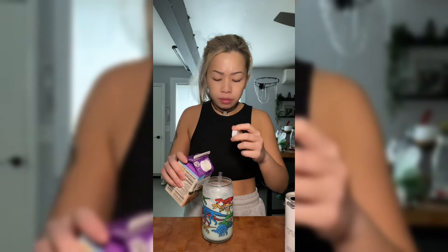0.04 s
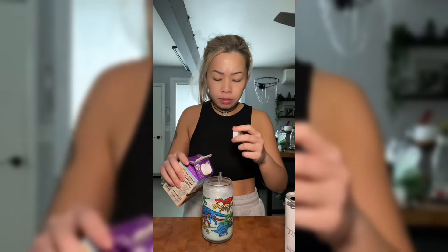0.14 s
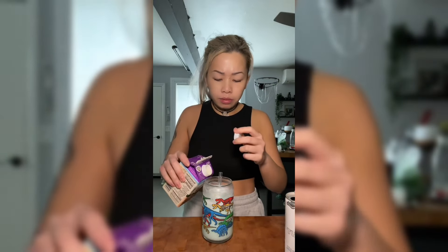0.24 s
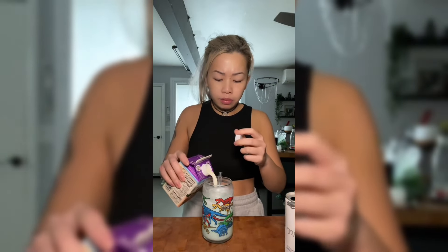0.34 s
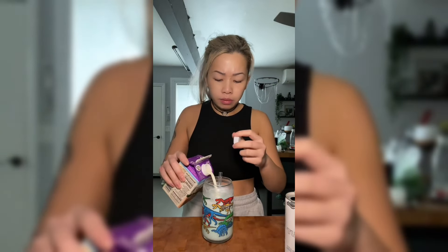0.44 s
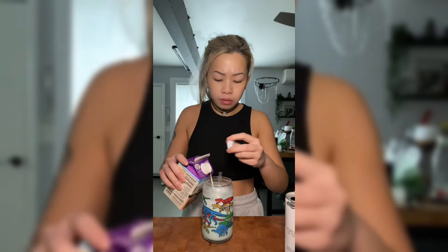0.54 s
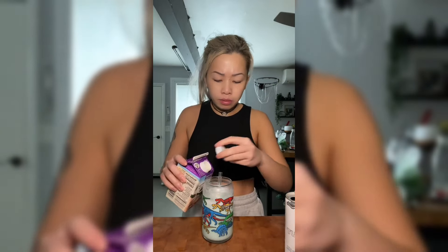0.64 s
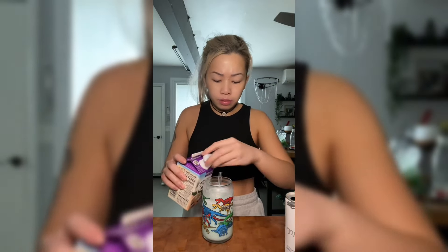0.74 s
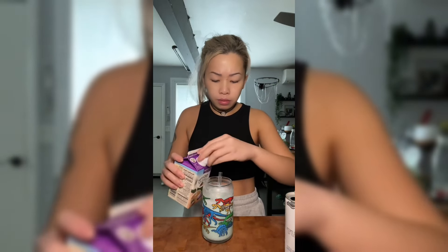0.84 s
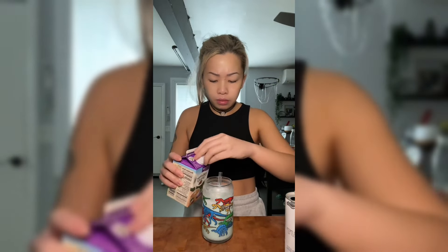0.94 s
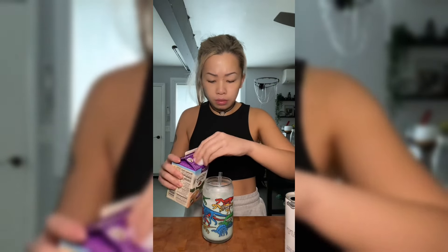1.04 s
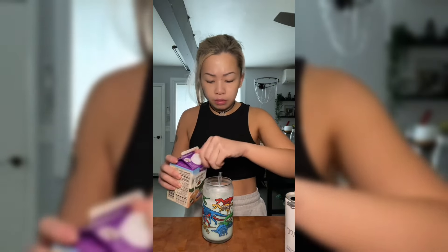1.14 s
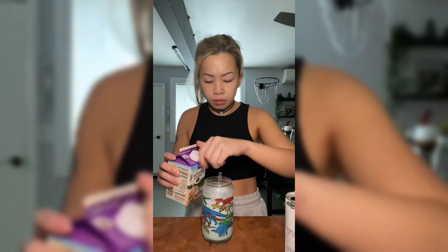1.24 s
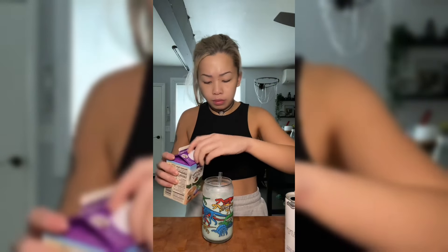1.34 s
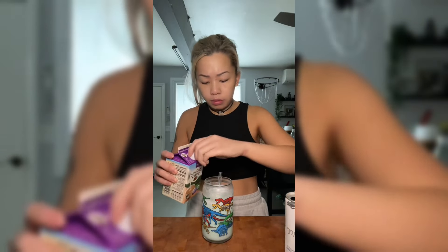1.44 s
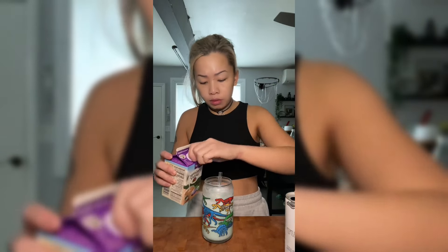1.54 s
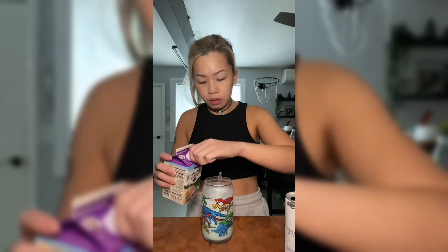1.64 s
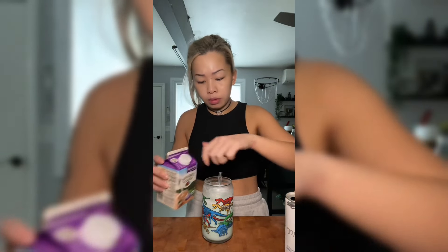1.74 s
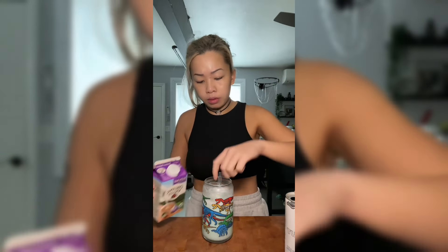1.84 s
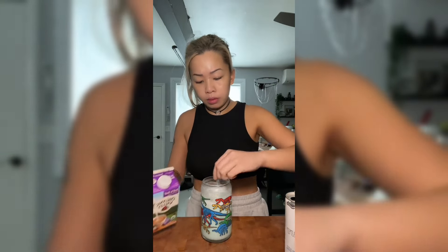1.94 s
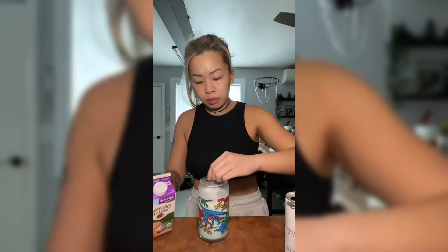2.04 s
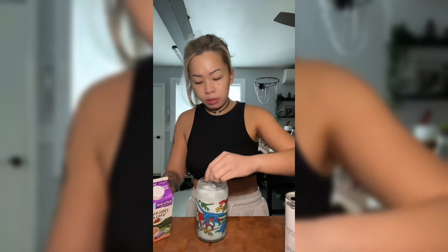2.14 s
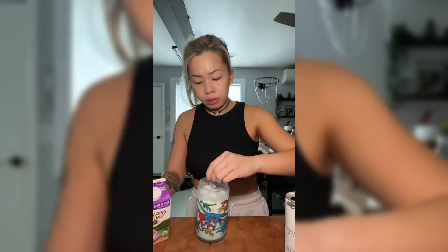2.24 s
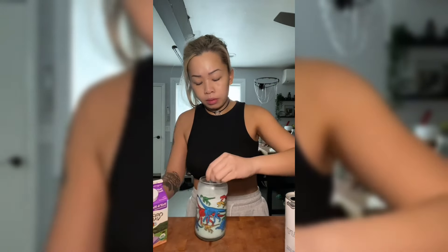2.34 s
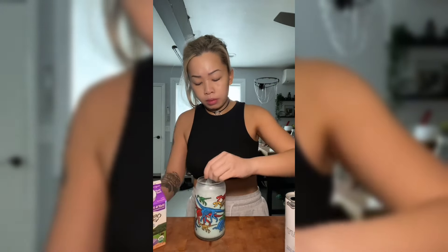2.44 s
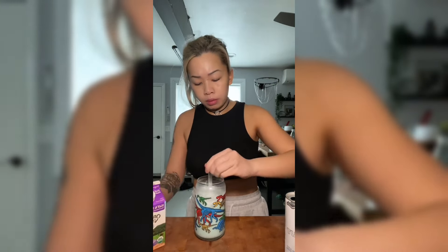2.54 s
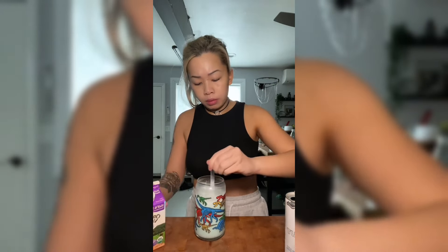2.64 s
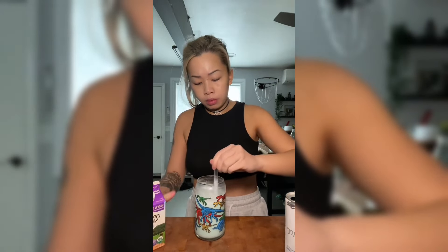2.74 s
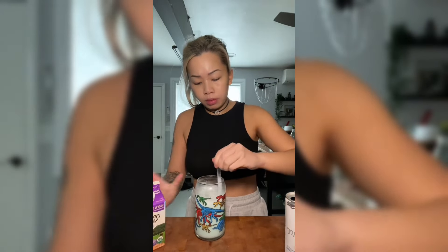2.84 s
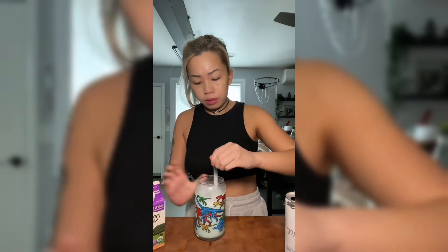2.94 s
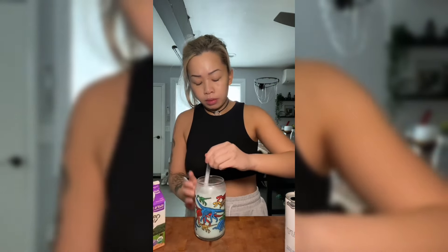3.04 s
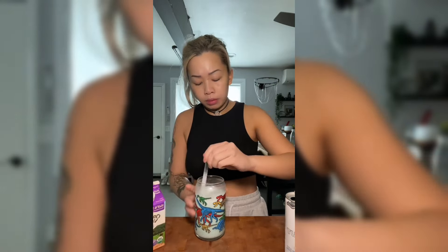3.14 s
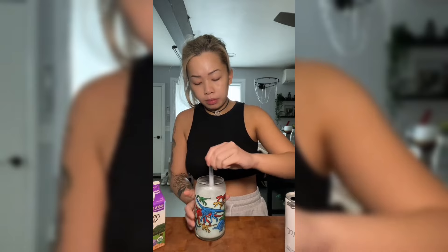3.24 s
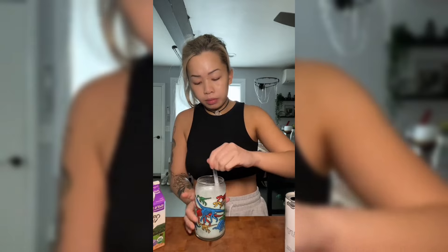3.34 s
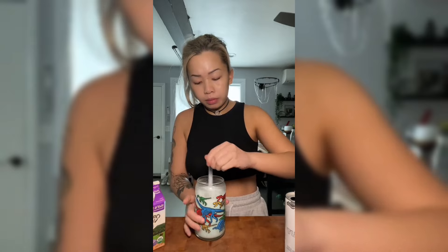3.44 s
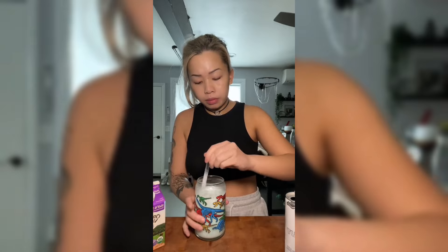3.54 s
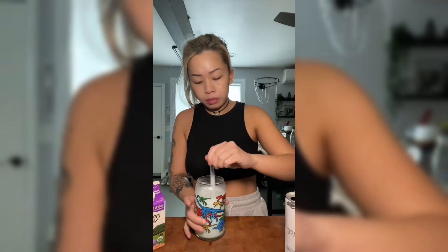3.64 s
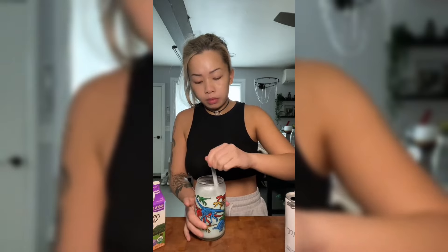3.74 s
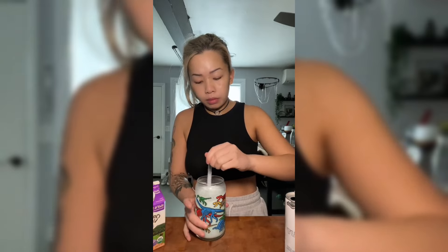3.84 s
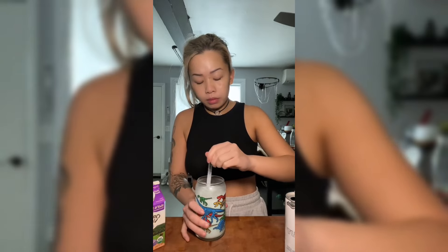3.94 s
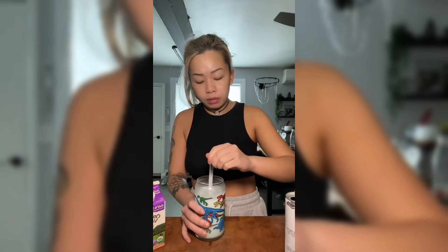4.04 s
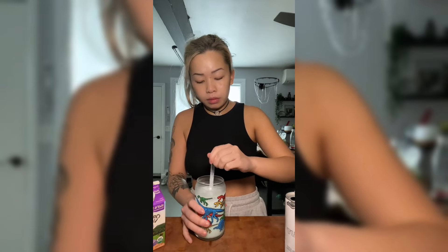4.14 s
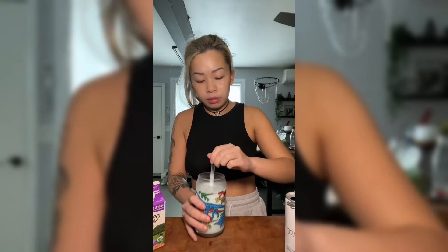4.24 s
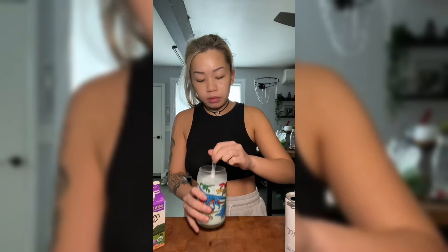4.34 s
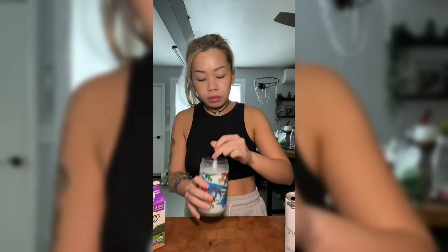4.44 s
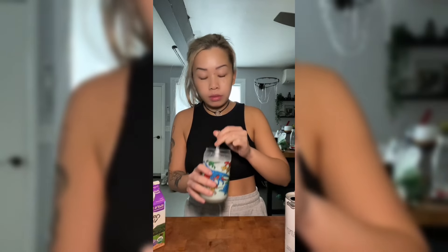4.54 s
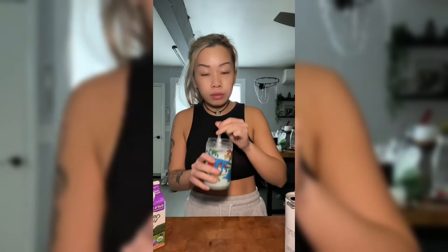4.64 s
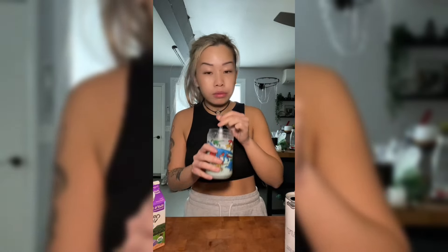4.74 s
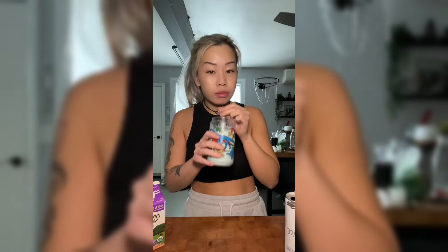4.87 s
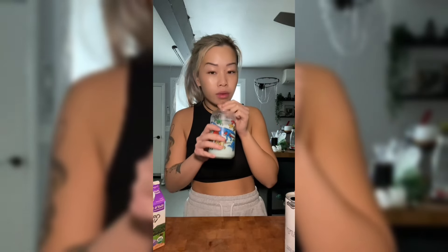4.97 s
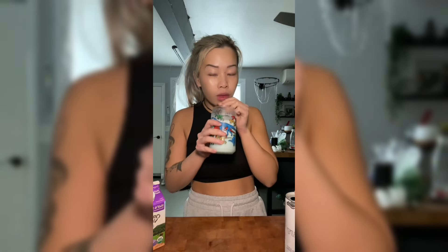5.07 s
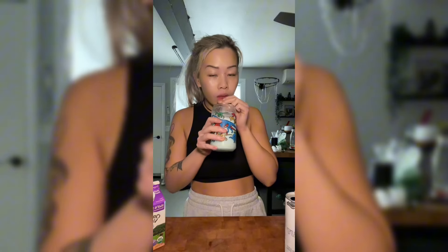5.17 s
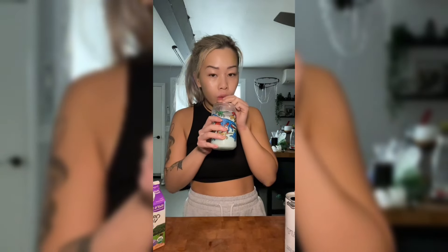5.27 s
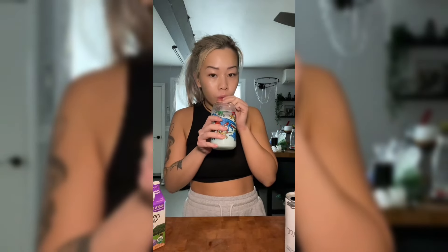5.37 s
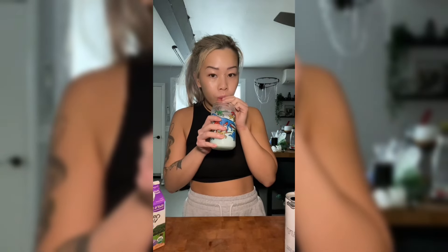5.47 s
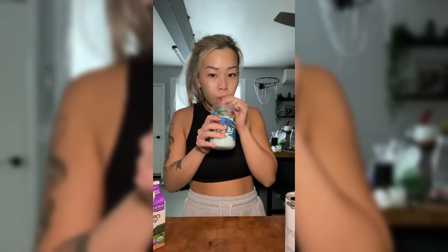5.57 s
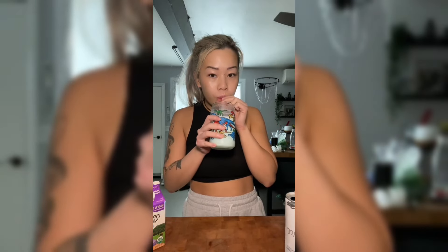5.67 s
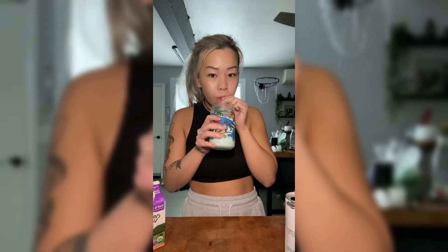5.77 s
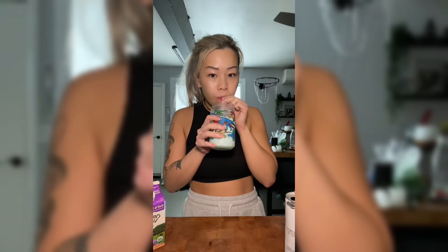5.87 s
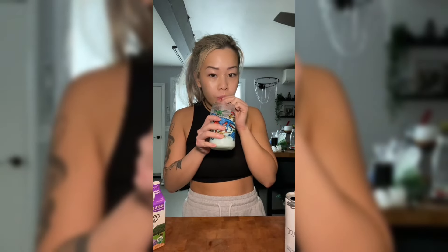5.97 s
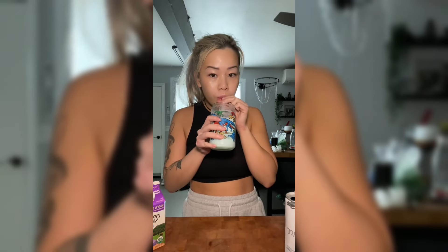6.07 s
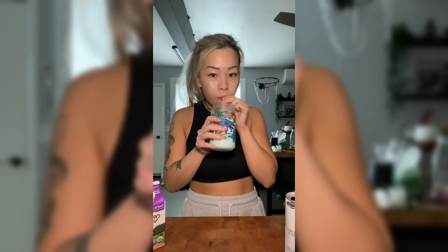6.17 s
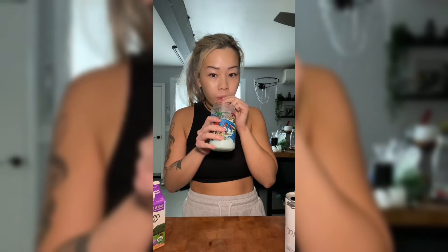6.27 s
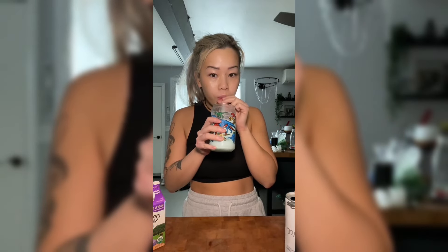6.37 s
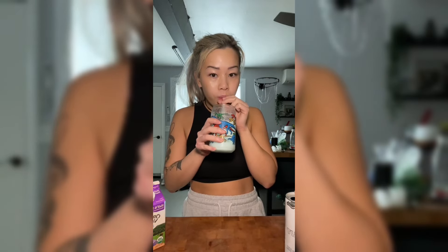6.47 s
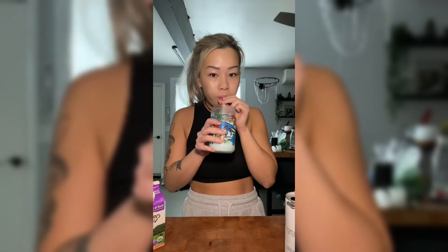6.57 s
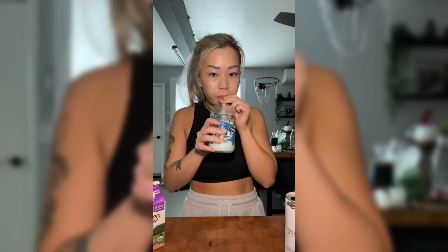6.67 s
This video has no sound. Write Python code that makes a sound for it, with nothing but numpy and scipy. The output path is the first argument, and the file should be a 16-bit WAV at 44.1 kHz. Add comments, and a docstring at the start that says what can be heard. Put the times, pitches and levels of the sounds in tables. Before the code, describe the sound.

Faint plastic clicks, then wet ice rattling busily against a filled glass jar, fading as it is lifted in a quiet humming kitchen.

```python
"""Quiet kitchen: ice cubes in a glass jar of milky drink, stirred with a straw a step from a phone.
First a carton's cap is screwed shut: clicks ring panel modes, noise strokes and rubs slide.
Then cubes knock on the liquid-damped wall and each other (pitched knock, clink); some contacts snap brightly.
A hand closes round the jar and dulls its ring; the cubes settle as it is lifted.
Hum, appliance drone, air and hiss lie beneath; the phone's limiter ducks after the hardest clink."""
import sys
import numpy as np
from scipy import signal
from scipy.fft import rfft, irfft
from scipy.io import wavfile
from scipy.ndimage import uniform_filter1d, minimum_filter1d

SR = 44100
rng = np.random.default_rng(int(sys.argv[2]) if len(sys.argv) > 2 else 0)


def unload_wav(signal):
    """Save mono or channel-first audio to the path in sys.argv[1] as 16-bit WAV at rate SR, clipped to [-1, 1]."""
    wavfile.write(
        sys.argv[1],
        SR,
        np.round(np.clip(np.atleast_2d(signal).T, -1, 1) * 32767).astype(np.int16),
    )


N = 295858
T = np.arange(N) / SR
HIT_T = T[:SR // 8]
LEAD_S = .002  # time from the start of a hit to its peak

# clearest ice contacts: (time [s], knock pitch [Hz], knock level [dB], hardness: clink over knock [dB])
ICE_CONTACTS = [(1.9514, 1080, -38.5, -23), (2.0021, 1160, -46.5, -7), (2.201, 1200, -39, -7),
                (2.252, 1200, -39.5, -11), (2.277, 1200, -40.5, -3), (2.2827, 1120, -43, -8),
                (2.3043, 1110, -32, -13), (2.313, 1160, -39, -22), (2.3408, 1250, -32.5, -0.5),
                (2.3799, 1210, -33, -7), (2.4023, 1080, -27.5, 0.5), (2.483, 1200, -33.5, -12),
                (2.5157, 1160, -37, 12.5), (2.573, 1170, -37, -4.5), (2.5991, 1440, -33, -6.5),
                (2.624, 1720, -39.5, -11), (2.6617, 1550, -41, -25), (2.6867, 1160, -35, -30),
                (2.7, 1130, -34, -16), (2.7051, 1150, -27, 1), (2.724, 1230, -45, -19),
                (2.744, 1220, -36.5, -17), (2.807, 1500, -41, 7), (2.8136, 1370, -29.5, -1.5),
                (2.8277, 1580, -29, -17), (2.994, 1650, -36, -7), (3.0107, 1500, -42, -23),
                (3.0214, 1210, -36, -25), (3.0488, 1430, -28.5, -12), (3.072, 1210, -51, -15),
                (3.089, 1380, -38.5, -2), (3.1163, 2080, -42.5, 3), (3.172, 1580, -41, 3.5),
                (3.1898, 1550, -33.5, -6), (3.221, 1590, -38.5, -15), (3.246, 1600, -45.5, 3.5),
                (3.3024, 1230, -39, -10), (3.3653, 1450, -29.5, -25), (3.533, 2260, -41.5, -7),
                (3.5564, 1030, -43, 0), (3.6, 1360, -41.5, -3), (3.612, 1200, -44, -8),
                (3.682, 1330, -45, -24), (3.727, 1160, -43.5, -7), (3.8, 900, -45, -22),
                (3.8331, 1155, -31, -3.5), (3.876, 1440, -32.5, -12.5), (3.9316, 1100, -38, -18),
                (3.9462, 1500, -33.5, -6), (3.954, 1480, -41, -12), (4.0115, 1450, -38.5, -7),
                (4.064, 1470, -52, -19), (4.0704, 1580, -36, -22), (4.086, 1910, -36.5, -8.5),
                (4.1821, 1770, -37, -7.5), (4.2246, 1120, -39, -34), (4.265, 1580, -40, -21),
                (4.3147, 1290, -40, -11), (4.3234, 1880, -38, -3), (4.3667, 1025, -36.5, -7.5),
                (4.376, 1750, -39, -8), (4.4514, 980, -40.5, -12), (4.52, 1060, -40.5, -8),
                (4.6183, 1337, -45, -1), (4.691, 1260, -49.5, -8), (4.8183, 1490, -43, -4),
                (4.9487, 1146, -42.5, 0.5), (5.023, 1060, -51, -3), (5.0754, 950, -41.5, -24),
                (5.094, 1600, -44, 5), (5.1494, 1280, -36, -6), (5.305, 1430, -49.5, -7),
                (5.476, 1170, -54.5, -10), (5.593, 1120, -56, -1), (5.731, 1124, -40.5, -25),
                (5.7487, 1220, -43.5, -21), (5.7724, 1080, -44, -21), (6.0767, 1180, -47.5, -29)]
# how hard the cubes jostle: (time [s], level before each layer's gain [dB])
STIRRING = [(1.85, -72), (1.94, -64), (1.97, -58), (2.02, -61), (2.1, -67.5), (2.2, -70), (2.3, -52.5),
            (2.44, -55), (2.54, -47.5), (3.03, -46.5), (3.21, -44.5), (3.36, -50.5), (3.64, -51.5),
            (3.79, -52.5), (3.92, -44.5), (4.1, -53.5), (4.87, -55), (5.09, -59.5), (5.24, -64.5),
            (5.419, -72), (5.95, -63), (6.14, -79), (6.601, -73.5)]
# spectrum of a dull thud: (frequency [Hz], level [dB])
THUD_SPECTRUM = [(120, -50), (300, -26), (700, -3), (1000, 8.5), (2200, -3.5), (3000, -6), (5000, -53)]
# spectrum of a clink: (frequency [Hz], level [dB])
CLINK_SPECTRUM = [(1500, -17), (2300, 1.5), (2750, -9.5), (3150, 1.5), (3650, -5.5), (4500, -2), (5100, -2),
                  (5900, -7.5), (7200, -14), (8300, -11.5), (9700, -8.5), (11500, -18)]


def undb(db):
    """Decibels to gain."""
    return 10 ** (np.asarray(db) / 20)


def level(x, db):
    """Set the rms level."""
    return x * undb(db) / np.sqrt(np.mean(x ** 2))


def strike(x, db, size=353):
    """Set the rms level of the first 8 ms of a hit."""
    return x * undb(db) / np.sqrt(np.mean(x[:size] ** 2))


def colour(x, points):
    """Causal (minimum-phase) filter with a smooth (Hz, dB) spectrum."""
    hz, db = np.transpose(points)
    size = 4096
    bins_hz = np.maximum(np.fft.rfftfreq(size, 1 / SR), 1)
    gain = undb(np.interp(np.log(bins_hz), np.log(hz), db))
    cepstrum = irfft(np.log(gain))
    # fold the cepstrum to make the response causal
    cepstrum[1:size // 2] *= 2
    cepstrum[size // 2 + 1:] = 0
    response = irfft(np.exp(rfft(cepstrum)))
    return signal.fftconvolve(x, response)[:len(x)]


def varied(points, scatter_db=2.5, shift=0.018):
    """Every piece has its own size, and so its own version of a spectrum."""
    hz, db = np.transpose(points)
    piece_hz = hz * np.exp(shift * rng.standard_normal())
    return np.column_stack([piece_hz, db + scatter_db * rng.standard_normal(len(db))])


def add(track, s, x):
    """Mix a sound in at time s."""
    start = int(s * SR)
    track[start:start + len(x)] += x[:N - start]


def flutter(rate_hz, depth_db):
    """An uneven gain: random levels held 1 / rate_hz s and smoothed."""
    hold = int(SR / rate_hz)
    steps = rng.standard_normal(N)[np.arange(N) // hold]
    return undb(depth_db * uniform_filter1d(steps, hold))


def ring(hz, t60_s):
    """One decaying mode."""
    return np.sin(2 * np.pi * hz * HIT_T) * np.exp(-np.log(1000) * HIT_T / t60_s)


def body(modes, scatter_db=3, detune=0.016):
    """Modes whose strength, sign and pitch change with the place of contact and the sloshing liquid."""
    out = np.zeros(len(HIT_T))
    for hz, db, t60_s in modes:
        sign, strength, pitch = rng.standard_normal(3)
        gain = np.sign(sign) * undb(db + scatter_db * strength)
        out += gain * ring(hz * (1 + detune * pitch), t60_s)
    return out


def sounded(force, response):
    """A body's answer to a contact force, at unit level."""
    return strike(signal.fftconvolve(force, response)[:len(force)], 0)


def contact(decay_s, rise_s=0.0021, peak=0.33, peak_s=0.0013):
    """A short noise burst that rises, peaks and dies away."""
    since = HIT_T - LEAD_S
    swell = np.exp(-np.abs(since) / np.where(since < 0, rise_s, decay_s))
    shape = swell + peak * np.exp(-np.abs(since) / peak_s)
    return shape * rng.standard_normal(len(HIT_T))


def knock(hz, cycles):
    """A short hollow knock: it swells for a cycle or two and dies away within the given number of cycles."""
    return strike(HIT_T * ring(hz, cycles / hz), 0)


def background():
    """Mains hum, the wavering drone of an appliance (narrow noise bands), room air and microphone hiss."""
    # appliance drone bands: (frequency [Hz], width [Hz], level [dB])
    drone_bands = [(56.6, 2.2, -61.5), (94.2, 4.5, -66.5), (120.2, 3.9, -60), (297.3, 28, -68.5)]
    # spectra of room air and hiss: (frequency [Hz], level [dB])
    air_spectrum = [(25, -46), (45, 9.5), (70, 4.5), (150, 7.5), (200, 0.5), (320, -0.5), (600, -8),
                    (900, -19), (1800, -19), (3500, -23.5), (16000, -30.5)]
    hiss_spectrum = [(1500, -27), (2500, -9), (2950, -3.5), (3500, -7.5), (4200, 1.5), (4700, 0.5),
                     (5800, 7.5), (7800, 9), (9000, 4), (10000, 4.5), (12400, -1.5), (14000, 4),
                     (16000, 1.5)]
    hum_hz, hum_db, air_db, hiss_db = 120.24, -49.5, -55, -50
    bins_hz = np.fft.rfftfreq(N, 1 / SR)
    out = level(np.sin(2 * np.pi * hum_hz * T), hum_db)
    for hz, width_hz, db in drone_bands:
        resonance = 1 / (1 + (2 * (bins_hz - hz) / width_hz) ** 2)
        out += level(irfft(rfft(rng.standard_normal(N)) * resonance, N), db)
    out += level(colour(rng.standard_normal(N), air_spectrum), air_db)
    out += level(colour(rng.standard_normal(N), hiss_spectrum), hiss_db)
    return out


def kitchen(x, t60_s=0.25, wet_db=-13.0, early_db=-13, early_t60_s=0.017, gap_s=0.0022):
    """Quick reflections from table and body, then the room's short tail."""
    # spectrum of the reflections: (frequency [Hz], level [dB])
    room_spectrum = [(150, 2.5), (1200, 0), (2500, 8.5), (5000, 1.5), (9500, 9.5), (12000, -2), (16000, 5)]
    t = T[:SR * 3 // 4]
    response = np.zeros(len(t))
    for decay_s, db in ((early_t60_s, early_db), (t60_s, wet_db)):
        echoes = rng.standard_normal(len(t)) * np.exp(-np.log(1000) * t / decay_s) * (t > gap_s)
        response += undb(db) * echoes / np.linalg.norm(echoes)
    return x + signal.fftconvolve(x, colour(response, room_spectrum))[:N]


def hits(table, modes, highs, bright, lowest_hz, burst_s, tone_db, cycles, thud_db, clink_s,
         crack_db, crack_s, ping_db, focus_db=9, blow=14):
    """Each contact: a short pitched knock rings the wall, with a clink of coloured noise, ping and crack."""
    # spectrum of a crack: (frequency [Hz], level [dB])
    crack_spectrum = [(3000, -66), (7000, 20), (10000, -18), (12300, -4), (14000, 10), (16000, -30)]
    # from grip_s on, a hand damps the wall's ring and its bright ping
    grip_s, grip_wall_db, grip_ping_db = 3.26, -4, -12
    crack_per_hardness = 0.14  # dB of crack per dB of hardness
    out = np.zeros(N)
    radiate = signal.butter(3, lowest_hz, "high", fs=SR, output="sos")
    # one clean blow at the peak of a short noise burst
    tap = signal.unit_impulse(len(HIT_T), int(LEAD_S * SR))
    for s, hz, knock_db, hardness_db in table:
        gripped = s > grip_s
        force = strike(contact(burst_s), 0) + blow * tap
        hard = strike(contact(clink_s), 0) + blow * tap
        # the place of contact favours the modes near the pitch of the knock
        near = [(f, db - focus_db * abs(np.log2(f / hz)), t60_s) for f, db, t60_s in modes]
        wall = undb(gripped * grip_wall_db) * sounded(force, body(near))
        tone = undb(tone_db) * sounded(tap, knock(hz, cycles))
        thud = strike(colour(force, THUD_SPECTRUM), thud_db)
        # a small body radiates little below its lowest mode
        hollow = signal.sosfilt(radiate, wall + tone + thud)
        ping = sounded(tap, body(highs, scatter_db=-1, detune=0.023))
        clink = strike(colour(hard, varied(bright)), 0) + undb(ping_db + gripped * grip_ping_db) * ping
        crack = colour(contact(crack_s), crack_spectrum)
        # a harder contact clinks more and cracks more
        treble = strike(clink, hardness_db) + strike(crack, crack_db + crack_per_hardness * hardness_db)
        add(out, s + 0.00054 - LEAD_S, undb(knock_db) * (strike(hollow, 0) + treble))
    return out


def rattle(curve, touch, gain_db, scrape_db, grit_db, count, spread_db=9.0, scrape_s=0.0086):
    """Many light touches and scrapes, as strong as the movement."""
    knocks, scrapes = np.zeros(N), np.zeros(N)
    s, curve_db = np.transpose(curve)
    for k, (place, size, hardness) in enumerate(rng.uniform(-1, 1, (count, 3))):
        when = s[0] + (k + 1 + place) / count * (s[-1] - s[0])
        db = gain_db + np.interp(when, s, curve_db) + spread_db * size
        add(knocks, when, strike(touch(), db))
        add(scrapes, when, strike(contact(scrape_s), db + spread_db * hardness))
    loudness = np.sqrt(np.mean(scrapes ** 2))
    bright = level(colour(scrapes, CLINK_SPECTRUM), scrape_db)
    grit = level(colour(scrapes, THUD_SPECTRUM), grit_db)
    return knocks + loudness * (bright + grit)


def thread(grain_db=4):
    """The cap slides on its plastic thread in short airy strokes."""
    # strokes of the cap: (time [s], length [s], level [dB])
    twists = [(0.95, 0.008, -41.5), (1.105, 0.1, -48)]
    # spectrum of the friction: (frequency [Hz], level [dB])
    swish_spectrum = [(3000, -15), (7000, -10), (10000, -10), (14000, -3), (16000, -4)]
    friction = level(colour(rng.standard_normal(N) * flutter(330, grain_db), swish_spectrum), 0)
    return friction * sum(undb(db) * np.exp(-(2 * (T - s) / length_s) ** 2) for s, length_s, db in twists)


def carton_closing():
    """Cap and carton: clicks ring the panels and cap, fingers and cap rub, the thread slides."""
    # clicks: (time [s], pitch [Hz], knock level [dB], hardness: click over knock [dB])
    clicks = [(0.2787, 1240, -58, -8), (0.4926, 1480, -59.5, -12), (0.545, 1190, -60.5, -14),
              (0.8074, 2580, -45.5, 0), (0.831, 914, -54, -7), (0.9165, 854, -54, 4), (0.9495, 850, -56, 0),
              (1.1066, 950, -48.5, -5), (1.1432, 930, -42.5, -5), (1.3911, 900, -62.5, 10.5),
              (1.5641, 1930, -46.5, 8)]
    # nominal modes of the panels, and bright modes of the cap: (frequency [Hz], level [dB], t60 [s])
    panels = [(873, -5, 0.067), (1115, -6, 0.021), (1390, -13, 0.019), (1820, -7.5, 0.0075),
              (2360, -2, 0.0076)]
    cap_modes = [(2860, 0, 0.0067), (4270, 2, 0.008)]
    # spectrum of a click: (frequency [Hz], level [dB])
    cap_spectrum = [(1500, -7), (2700, -3), (4500, -8), (7000, -5), (9000, -6), (12000, -13)]
    # rubbing on the carton: (time [s], level before gain [dB])
    rub = [(.2, -73), (.53, -93), (.77, -93), (.82, -70), (.86, -65), (.9, -54.5), (.94, -58), (1.02, -78),
           (1.11, -64), (1.17, -60), (1.25, -78), (1.7, -70.5)]
    clicking = hits(clicks, panels, cap_modes, cap_spectrum, lowest_hz=416, burst_s=0.0082, tone_db=-0.5,
                    cycles=19, thud_db=-5.0, clink_s=0.0054, crack_db=-16, crack_s=0.005, ping_db=-8.5)
    rubbing = rattle(rub, lambda: body(panels), gain_db=-2.0, scrape_db=-4.0, grit_db=-6.5, count=170)
    return clicking + rubbing + thread()


def bumps(rise_s=0.00062, slosh_db=-8, slosh_s=0.017):
    """Soft low thumps of liquid, carton and jar, each with an uneven slosh at the same pitch."""
    # plunging cubes and hollow bumps: (time [s], pitch [Hz], level [dB], t60 [s])
    thumps = [(1.144, 246, -43, 0.022), (1.566, 240, -46, 0.033), (2.187, 134, -43, 0.053),
              (2.4452, 984, -31.5, 0.016), (2.449, 305, -33, 0.033), (2.464, 235, -38.5, 0.033),
              (2.482, 145, -44, 0.13), (4.14, 143, -47, 0.19)]
    out = np.zeros(N)
    for s, hz, db, t60_s in thumps:
        thump = strike(ring(hz, t60_s) * (1 - np.exp(-HIT_T / rise_s)), 0)
        slosh = sounded(contact(slosh_s), ring(hz, slosh_s))
        add(out, s, strike(thump + undb(slosh_db) * slosh, db))
    return out


def swirl(gain_db=-2.0, churn_db=4.0, grain_db=4.5):
    """Wet cubes slide along the wall in the turning liquid: a grainy wash that follows the stirring."""
    # spectrum of the wash: (frequency [Hz], level [dB])
    wash_spectrum = [(200, -8), (400, -9.5), (530, 1.5), (720, -5), (1150, 1.5), (1550, -0.5), (2200, -5),
                     (2800, -11), (4000, -6), (4900, -17), (6500, -15), (10000, -43), (16000, -16)]
    s, db = np.transpose(STIRRING)
    sliding = rng.standard_normal(N) * flutter(35, churn_db) * flutter(400, grain_db)
    return level(colour(sliding, wash_spectrum), gain_db) * undb(np.interp(T, s, db)) * (T > s[0])


def light_touch(centre_hz=1280, spread=0.212, cycles=16, cycles_spread=0.44):
    """The knock of any one cube: its size sets the pitch, the liquid around it the length."""
    size, wetness = np.clip(rng.standard_normal(2), -2, 2)
    return knock(centre_hz * np.exp(-spread * size), cycles * np.exp(-cycles_spread * wetness))


def nudges(drop_db=-18, spread_db=3, soonest_s=0.0055, latest_s=0.042, hard_db=-9, count=3):
    """Each clear contact pushes the neighbouring cubes, which touch lightly a moment later."""
    knocks, ticks = np.zeros(N), np.zeros(N)
    for s, _, knock_db, _ in ICE_CONTACTS:
        for delay, size in rng.uniform(0, 1, (count, 2)):
            when = s + soonest_s + delay * (latest_s - soonest_s)
            db = knock_db + drop_db + spread_db * (2 * size - 1)
            add(knocks, when, strike(light_touch(), db))
            add(ticks, when, strike(contact(0.0023), db + hard_db))
    return knocks + level(colour(ticks, CLINK_SPECTRUM), 0) * np.sqrt(np.mean(ticks ** 2))


def bright_snaps(snap_s=0.003, tail_db=-20.0, tail_s=0.066, grain=1.0, dull_hz=10500):
    """A sharp bright snap with a duller grainy tail, longer after a stronger snap."""
    # bright snaps: (time [s], snap level [dB])
    snaps = [(2.304, -36.5), (2.8126, -17.5), (2.824, -31), (2.9933, -36), (3.8348, -38), (3.9284, -39),
             (5.097, -40)]
    # spectrum of a bright snap: (frequency [Hz], level [dB])
    snap_spectrum = [(700, -51), (2500, -11), (4800, 12.5), (9500, 1.5), (16000, 6.5)]
    out = np.zeros(N)
    strongest_db = max(db for s, db in snaps)
    dull = signal.butter(2, dull_hz, fs=SR, output="sos")
    for s, db in snaps:
        decay_s = tail_s * undb((db - strongest_db) / 2)
        # grain strength changes every 20 samples
        strength = np.repeat(np.exp(grain * rng.standard_normal(len(HIT_T))), 20)[:len(HIT_T)]
        tail = signal.sosfilt(dull, colour(contact(decay_s) * strength, snap_spectrum))
        snap = colour(contact(snap_s), snap_spectrum)
        add(out, s, strike(snap, db) + strike(tail, db + tail_db))
    return out


def ice_stirring():
    """Cubes in the jar: clear contacts, nudged neighbours, bright snaps, a fine rattle and a sliding wash."""
    # nominal modes of the filled jar, damped by liquid and hand: (frequency [Hz], level [dB], t60 [s])
    jar = [(884, -7.5, 0.032), (1136, -5, 0.049), (1280, 5, 0.016), (1418, 1.5, 0.024), (1665, 5, 0.0076),
           (1940, 8, 0.0087), (2265, 2, 0.014)]
    # bright modes of the glass: (frequency [Hz], level [dB], t60 [s])
    glass = [(4310, -3, 0.0069), (4850, -4, 0.014), (5100, 1, 0.0057), (8060, -17, 0.011)]
    contacts = hits(ICE_CONTACTS, jar, glass, CLINK_SPECTRUM, lowest_hz=720, burst_s=0.0035, tone_db=0.5,
                    cycles=11.6, thud_db=-4, clink_s=0.0035, crack_db=-16.5, crack_s=0.0029, ping_db=3)
    jostling = rattle(STIRRING, light_touch, gain_db=-5, scrape_db=-11.5, grit_db=-6.0, count=520)
    return contacts + nudges() + bright_snaps() + jostling + swirl()


def scene():
    """Carton, ice and liquid in the kitchen, over the background."""
    near = carton_closing() + bumps() + ice_stirring()
    return (background() + kitchen(near))[None]


def limiter(x, ceiling=.36, hold_s=.1, release_s=.04):
    """The gain drops at once on a peak, is held, then recovers."""
    hold, release = int(hold_s * SR) | 1, int(release_s * SR) | 1
    held = minimum_filter1d(ceiling / np.maximum(np.abs(x), ceiling), hold, origin=hold // 2)
    gain = np.minimum(held, uniform_filter1d(held, release, origin=release // 2))
    # round the corners over about 1 ms
    return x * uniform_filter1d(minimum_filter1d(gain, size=45), size=45)


def record(dry):
    """The phone limits the hardest peaks and cuts the top."""
    top_hz = 15900
    low_pass = signal.ellip(10, .2, 70, top_hz, fs=SR, output="sos")
    return signal.sosfilt(low_pass, limiter(dry))


dry = scene()
out = record(dry)
unload_wav(out)
```